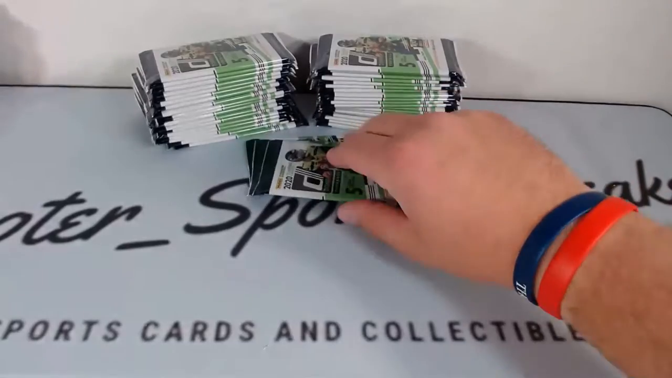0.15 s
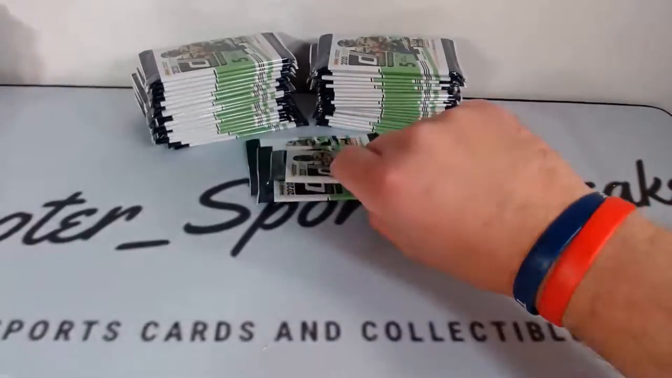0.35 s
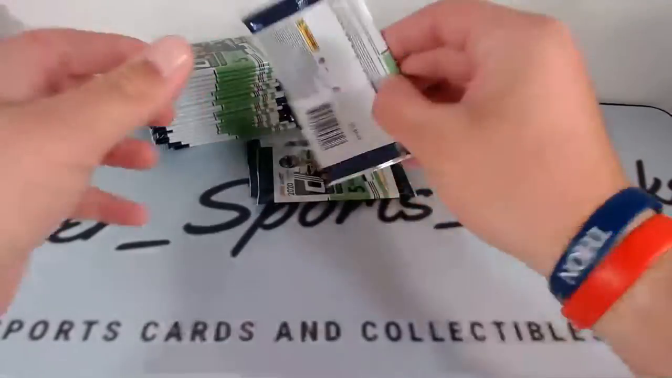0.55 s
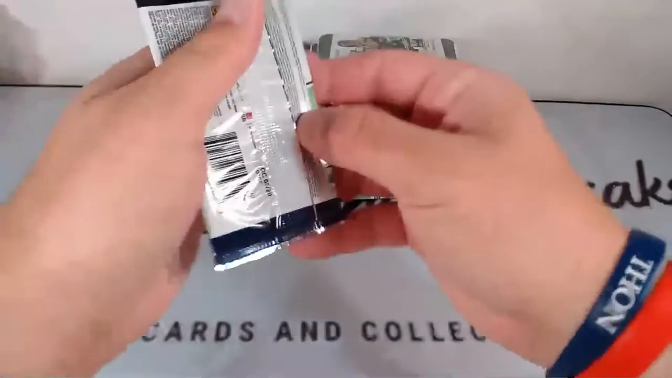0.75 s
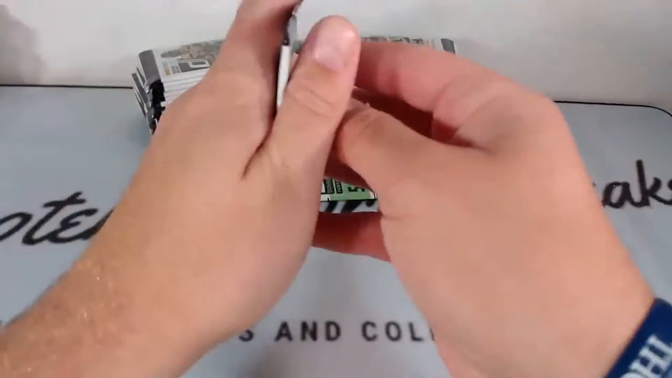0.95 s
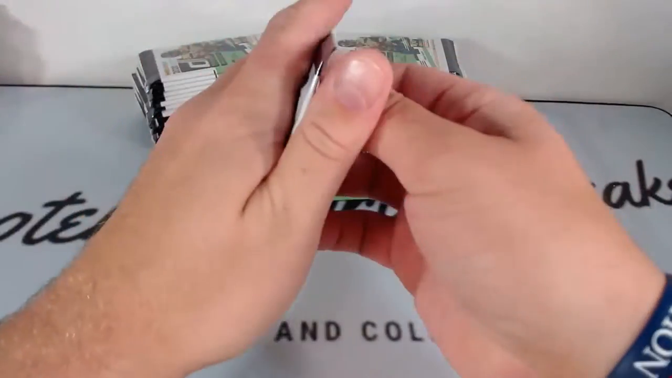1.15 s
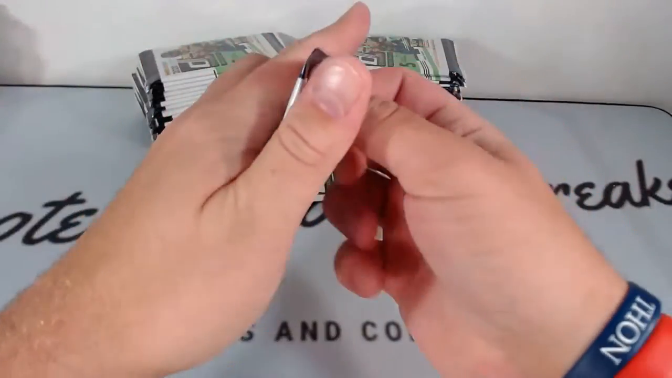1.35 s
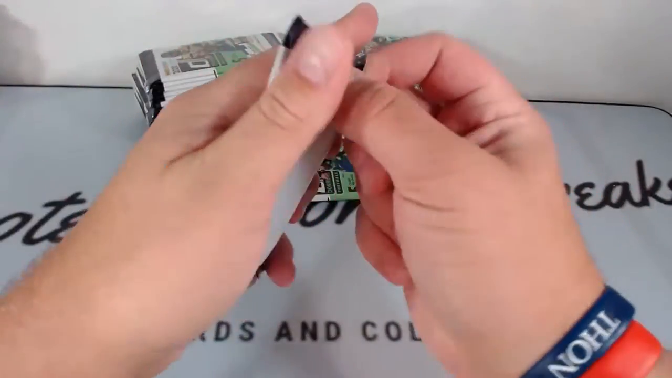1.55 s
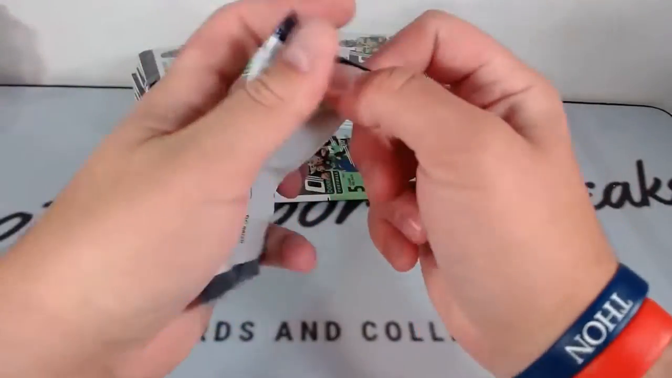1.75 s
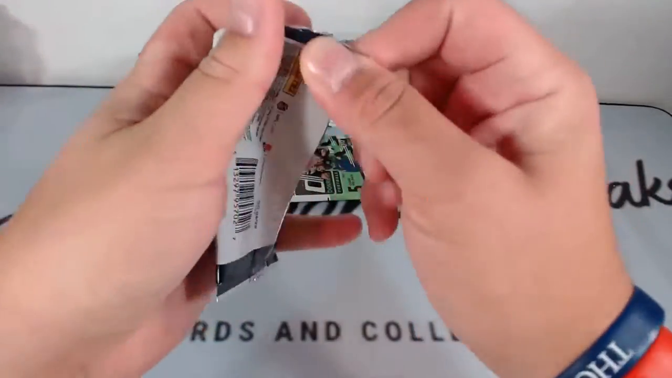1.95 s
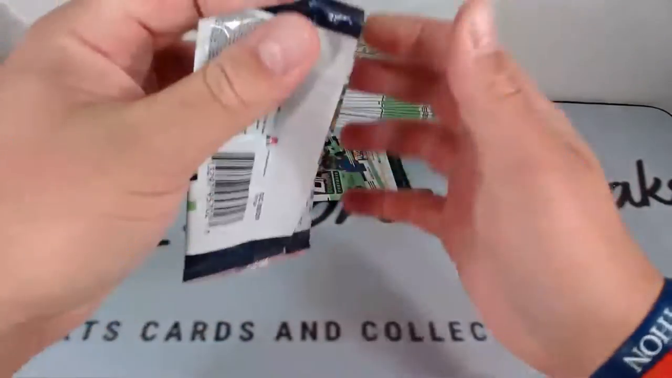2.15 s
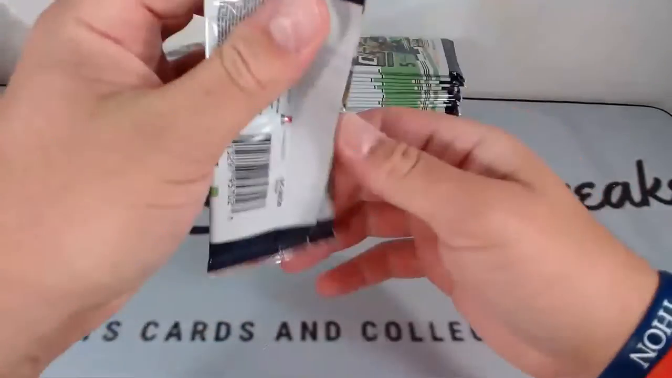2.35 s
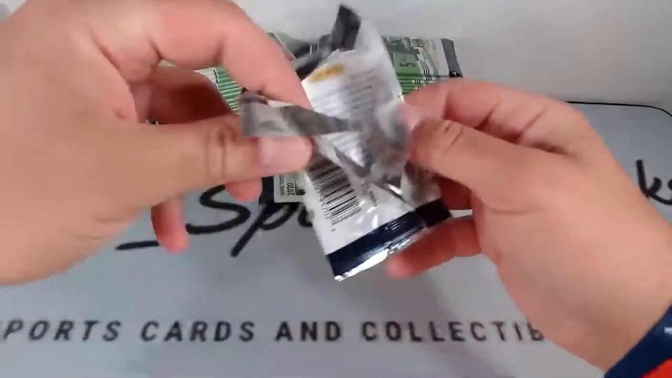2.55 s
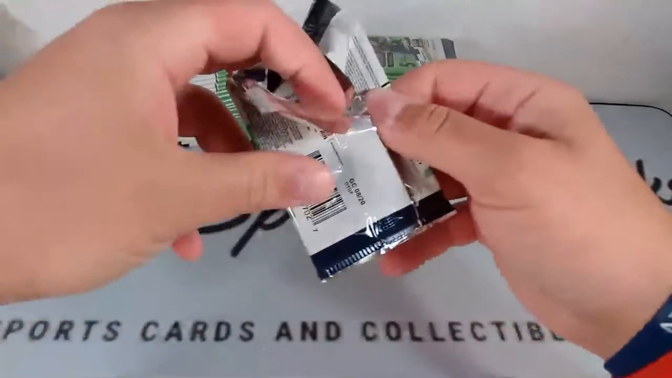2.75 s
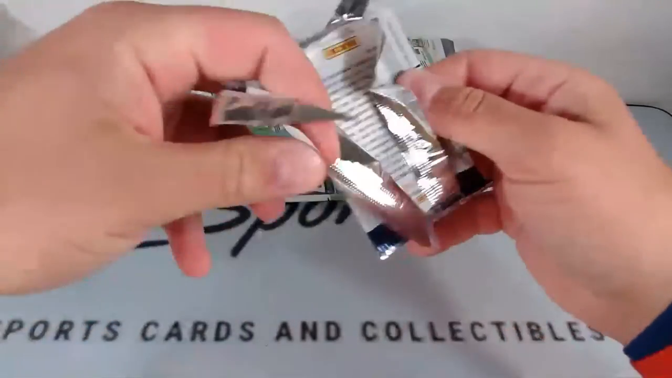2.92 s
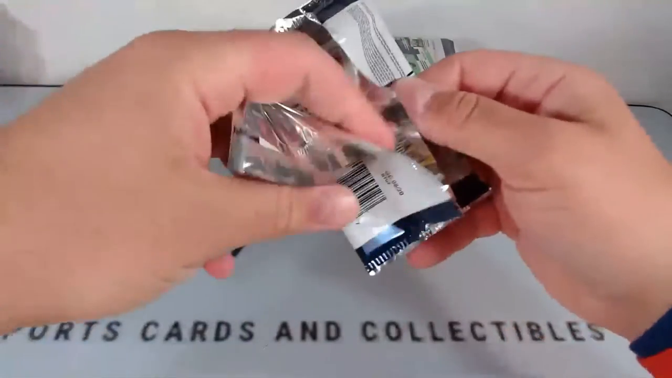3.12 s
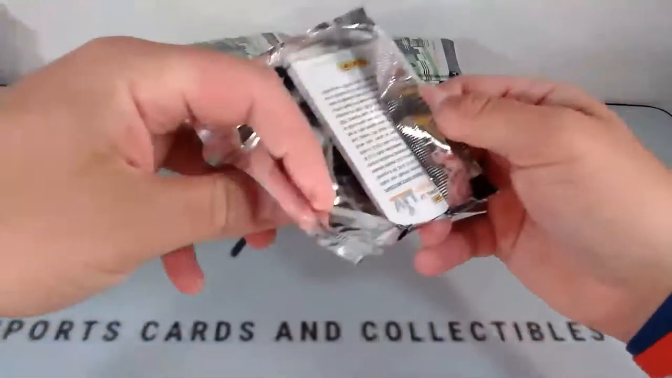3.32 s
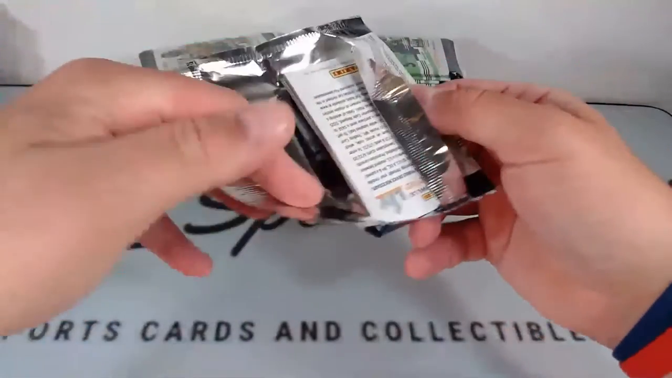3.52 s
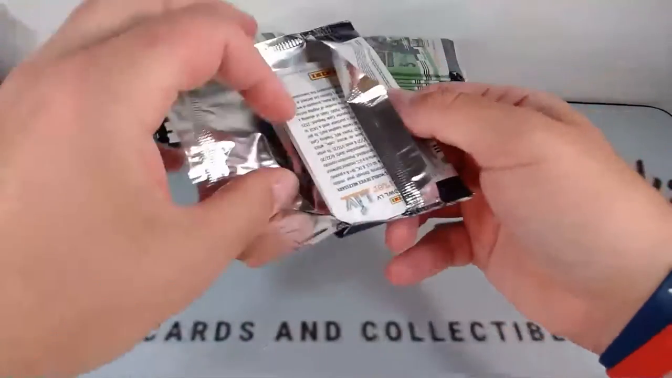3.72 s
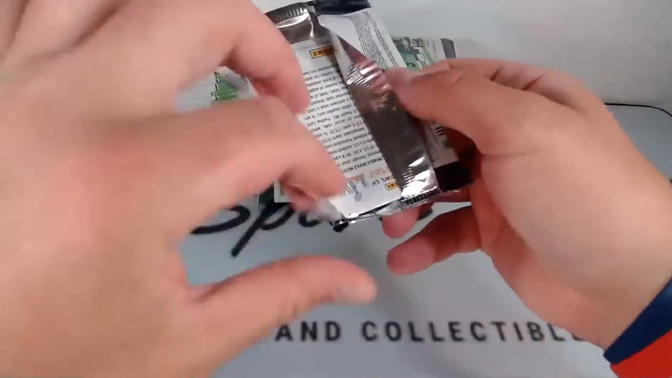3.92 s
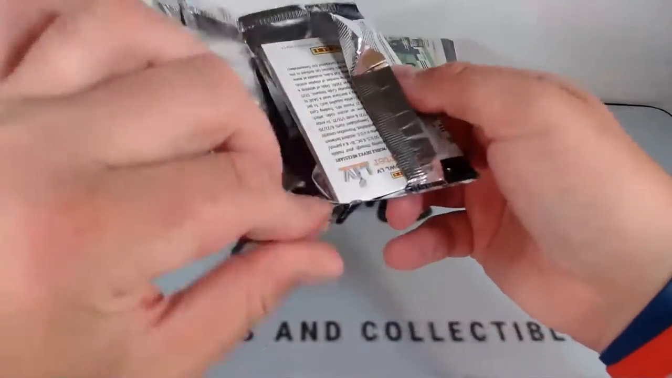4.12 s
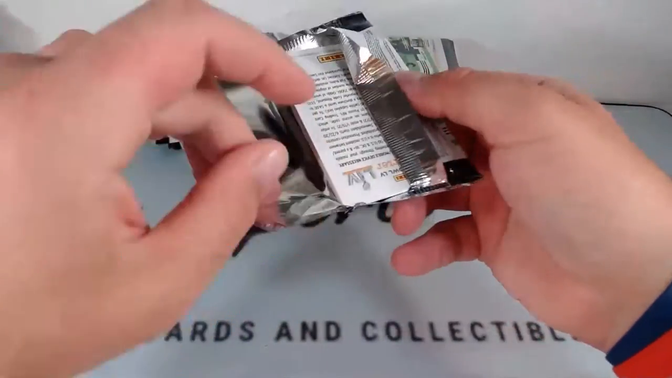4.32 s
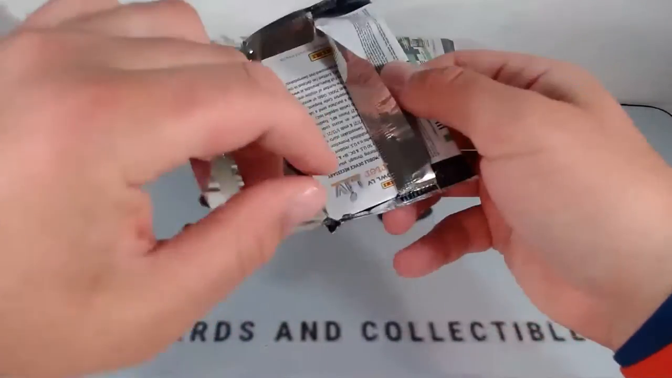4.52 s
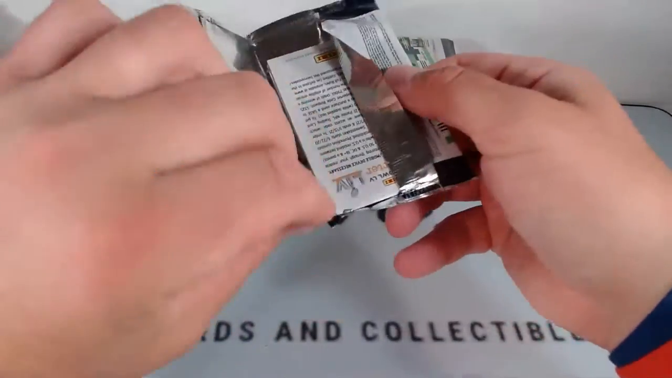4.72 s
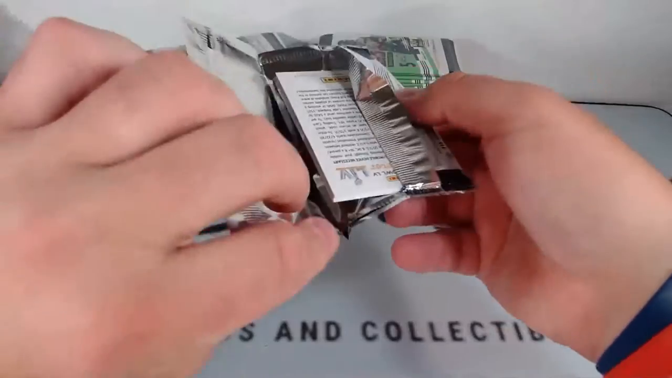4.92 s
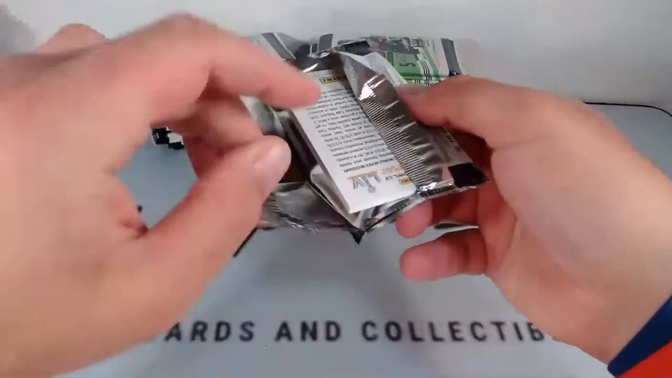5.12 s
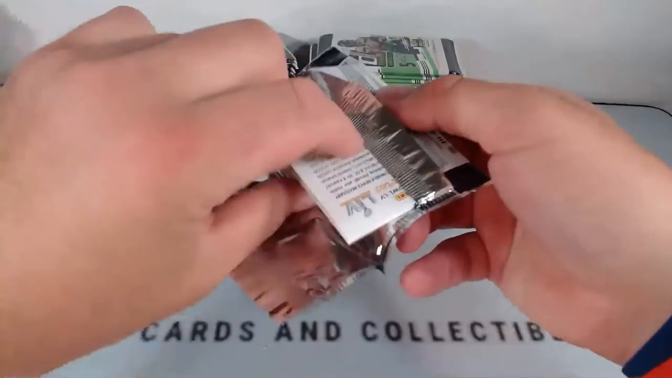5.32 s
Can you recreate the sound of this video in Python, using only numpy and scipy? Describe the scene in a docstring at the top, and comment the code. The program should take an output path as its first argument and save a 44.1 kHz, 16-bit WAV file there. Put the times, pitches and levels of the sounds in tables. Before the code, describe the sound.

Hands pull a stiff foil packet apart: sharp dry snaps, short tearing runs and dense crackle, then sparse small crinkles in a small room.

```python
"""Foil hisses and soft bumps sound as a pack of cards is picked off a table, close to a small microphone.
It is then pulled open and peeled back by hand: creases snap singly, the seam rips in short runs, facets crackle.
Hiss, rips and crackle are streams of tiny noise buckles; snaps are a click plus one buckle; bumps are short sines.
Table modes and a small room ring after each sound; the microphone passes little above 7 kHz."""
import sys
import numpy as np
from scipy import signal
from scipy.fft import rfft, irfft
from scipy.io import wavfile
from scipy.ndimage import uniform_filter1d

SR = 44100
rng = np.random.default_rng(int(sys.argv[2]) if len(sys.argv) > 2 else 0)


def inscribe(sig):
    """Save sig as 16-bit PCM at rate SR to the path in sys.argv[1].

    A 1-D sig is mono; a 2-D sig holds one channel per row.
    Samples are clipped to [-1, 1] before scaling.
    """
    pcm = np.round(np.clip(np.atleast_2d(sig).T, -1, 1) * 32767)
    wavfile.write(sys.argv[1], SR, pcm.astype(np.int16))


N = 236640
TIME = np.arange(N) / SR


def amp(db):
    """Decibels to gain."""
    return 10 ** (np.asarray(db) / 20)


def evened(x):
    """Scales to an rms of one."""
    return x / np.sqrt(np.mean(x ** 2) + 1e-20)


def read(points, hz):
    """Reads (f/Hz, value) points on a logarithmic frequency axis."""
    f, value = np.transpose(points)
    return np.interp(np.log(hz + 1), np.log(f + 1), value)


def add(mix, s, sound):
    """Mixes a sound in at time s."""
    part = mix[max(round(s * SR), 0):][:len(sound)]
    part += sound[:len(part)]


def colour(x, points, size=2048):
    """Causal minimum-phase filter with the given (f/Hz, level/dB) outline; keeps its ringing tail."""
    log_gain = np.log(amp(read(points, abs(np.fft.fftfreq(size, 1 / SR)))))
    taps = np.fft.ifft(np.exp(np.conj(signal.hilbert(log_gain)))).real
    return signal.fftconvolve(x, taps[:size // 2])


FACET_RISE_S = 0.00045


def facet(ring_s, share, size=512):
    """One buckle: a brief flutter whose chance resonances are about a share of their pitch wide."""
    t, bins = np.arange(size) / SR, np.arange(size + 1)
    envelope = np.exp(-t / ring_s) * (1 - np.exp(-t / FACET_RISE_S))
    z = rfft(rng.standard_normal(size) * envelope, 2 * size)
    total, reach = np.cumsum(abs(z) ** 2), share * bins + 2
    above, below = np.interp(bins + reach, bins, total), np.interp(bins - reach, bins, total)
    power = (above - below) / (2 * reach)
    # evens out the broad outline only
    log_gain = -np.log(np.r_[power, power[-2:0:-1]] + 1e-12) / 2
    flatten = np.exp(np.conj(signal.hilbert(log_gain)))[:size + 1]
    return irfft(z * flatten)[:size]


def crackle(per_s, spread_db, ring_s, count=24):
    """A steady stream of tiny buckles of uneven size, shared among a few facets."""
    size_db = spread_db * np.minimum(rng.exponential(1, N), 4)
    clicks = (rng.random(N) < per_s / SR) * amp(size_db)
    # the hand feeds in energy steadily
    clicks /= np.sqrt(abs(uniform_filter1d(clicks ** 2, size=700)) + 1e-4)
    which = rng.integers(0, count, N)
    return sum(signal.oaconvolve(clicks * (which == k), facet(ring_s, share=0.36))[:N] for k in range(count))


RING_HALF_WIDTH = 0.13  # share of its pitch


def ringing(points, hz, db):
    """Adds the resonance of one patch of foil to a (f/Hz, level/dB) outline."""
    f = np.geomspace(20, 20000, 300)
    return np.c_[f, read(points, f) + db / (1 + ((f / hz - 1) / RING_HALF_WIDTH) ** 2)]


def stroke(start, end, attack_s, sag_db_per_s, release_s):
    """Gain of one move of the fingers: attack, a sloping hold, release."""
    held = np.clip(TIME - start, 0, end - start)
    release = np.exp(-np.maximum(TIME - end, 0) / release_s)
    return np.minimum(held / attack_s, 1) * amp(-sag_db_per_s * held) * release


# foil brushing over foil: [start t/s, end t/s, level/dB, resonance f/Hz, rasp lift/dB]
BRUSHES = [(.008, 0.058, -67, 5400, -2), (0.084, 0.286, -84, 5040, -1), (0.12, 0.172, -68.5, 4830, -2),
           (0.156, 0.219, -74, 5000, -2), (0.278, 0.371, -70.5, 6140, -7), (0.368, 0.463, -79, 5170, -4),
           (0.462, 0.494, -66.5, 4720, 4), (0.493, 0.529, -58.5, 4700, 3.5), (0.814, 0.88, -69.5, 5700, 0),
           (0.95, 0.997, -78, 5200, -8), (1.02, 1.086, -76, 5040, 0), (3.782, 3.832, -71, 5480, 9),
           (3.916, 3.984, -58.5, 5650, 3), (3.98, 4.033, -73.5, 5600, 6)]
# sliding foil hiss: [f/Hz, level/dB]
HISS = [(300, -48), (900, -30), (2200, -17.5), (3100, -18), (4000, -12.5), (5000, -4.5), (7000, -4.5)]
# band of the rasp: [f/Hz, share of the rasp lift]
RASP = [(1000, 0.074), (1800, 0.69), (3400, 1), (4600, 0)]
BRUSH_ATTACK_S, BRUSH_RISE_DB_PER_S, BRUSH_RELEASE_S = 0.0099, 6, 0.0043
BRUSH_RING_DB = 3


def slide():
    """Smooth foil slips over foil with a thin hiss, coloured by the patch that is rubbed."""
    out, grains = np.zeros(N), crackle(per_s=2000, spread_db=2.5, ring_s=0.0004)
    for start, end, db, hz, rasp_db in BRUSHES:
        f, tone_db = ringing(HISS + [(9000, -15.5)], hz, BRUSH_RING_DB).T
        hiss = colour(grains, np.c_[f, tone_db + rasp_db * read(RASP, f)])[:N]
        gain = stroke(start, end, BRUSH_ATTACK_S, -BRUSH_RISE_DB_PER_S, BRUSH_RELEASE_S)
        out += amp(db) * evened(hiss) * gain
    return out


# hands bumping table and pack: [t/s, level/dB before a 3 dB lift of the swing, f/Hz]
BUMPS = [(0.029, -64, 72.6), (0.142, -41, 127), (0.158, -31, 104), (0.245, -40, 87.5), (0.26, -44, 93.5),
         (0.295, -51, 113), (.312, -54, 109), (1.046, -57, 126), (1.433, -48, 370), (1.502, -50.5, 337),
         (1.938, -19.5, 310), (1.991, -39.5, 317.3), (2.022, -44, 285), (2.061, -38.5, 276),
         (2.424, -56, 90.5), (2.43, -45.5, 246.7), (3.047, -36, 263), (3.1, -36.5, 326),
         (3.533, -41.5, 260), (3.557, -50.5, 74.5), (3.766, -45, 300), (3.77, -50, 102), (3.976, -51, 122),
         (4.163, -43.5, 313), (4.568, -54.5, 350), (4.936, -61, 285), (5.094, -63, 100),
         (5.179, -45.5, 310)]
# skin rub spectrum: [f/Hz, relative level/dB]
RUB = [(60, -14.5), (140, 11), (330, -17.5), (800, -29), (2500, -47.5), (6000, -36)]
BUMP_CYCLES = 0.8  # from the centre to 1/e
# the rub grows no louder once the tabled bump level passes the limit
RUB_DB, RUB_S, RUB_LIMIT_DB = -20, 0.017, -37.5


def bumps():
    """The hand pushes on the padded table or the pack: a few slow, rounded swings and a soft rub."""
    out, rub = np.zeros(N), evened(colour(rng.standard_normal(N), RUB)[:N])
    for s, db, hz in BUMPS:
        t = TIME - s
        swing = np.exp(-(t * hz / BUMP_CYCLES) ** 2) * np.sin(2 * np.pi * hz * t)
        out += amp(db + 3.0) * swing
        out += amp(min(db, RUB_LIMIT_DB) + RUB_DB) * np.exp(-(t / RUB_S) ** 2) * rub
    return out


# room decay: [f/Hz, t60/s]
ROOM_T60 = [(90, 0.098), (220, 0.17), (700, 0.18), (2000, 0.12), (7000, 0.15)]
# room against the direct sound: [f/Hz, level/dB]
ROOM_DB = [(100, -6), (300, -5), (800, -9), (1500, -7), (3000, -11), (7000, -12.5)]


def walls(t):
    """Sparse reflections for one position of the hands, each band dying at its own speed."""
    sparse = rng.random(len(t)) < 5000 / SR
    taps = rng.standard_normal(len(t)) * sparse * np.clip((t - 0.002) / 0.006, 0, 1)
    hz, at, z = signal.stft(taps, SR, nperseg=256)
    decay = amp(-60 * at / read(ROOM_T60, hz)[:, None])
    tail = signal.istft(z * decay, SR, nperseg=256)[1]
    return colour(tail / np.linalg.norm(tail), ROOM_DB)[:len(t)]


# table top and things on it: [f/Hz, level/dB, t60/s]
TABLE_MODES = [(325, -8, .1), (489, -9, .1), (618, -8, .13), (734, -8.5, .12), (820, -14, .12),
               (905, -6, .14), (1421, -7, .1), (2750, -14, .12), (2900, -12, .12)]
POSITION_S = 0.17


def surroundings(x, count=4):
    """The table rings, and the walls answer with a pattern that shifts as the hands move."""
    t, ring = np.arange(SR // 2) / SR, 0
    for hz, db, t60 in TABLE_MODES:
        unit_peak = 2 * np.log(1000) / (t60 * SR)
        ring = ring + amp(db) * unit_peak * amp(-60 * t / t60) * np.sin(2 * np.pi * hz * t)
    out = signal.fftconvolve(x, ring)[:N]
    place = TIME / POSITION_S
    for k in range(count):  # crossfades round the positions in turn
        away = abs((place - k) % count - count / 2)
        out += signal.fftconvolve(x * np.cos(np.pi / 2 * np.minimum(away, 1)), walls(t))[:N]
    return out


# corners of the thud, pop, crack and bright edge: [f/Hz]
FOIL_HZ = [120, 300, 680, 1300, 2100, 3500, 5000]


def foil_tone(thud_db, pop_db, bright_db):
    """Spectrum of a buckling patch: wide panels give the low end, sharp creases the top."""
    low_db = [thud_db - 40, thud_db - 16, thud_db]
    return list(zip([20] + FOIL_HZ, low_db + [pop_db, min(0.18 * pop_db, 9), 0, 0, bright_db]))


# long pull splitting the seam: [t/s, effort level/dB, panel flex/dB]
SPLIT = [(1.14, -85, 2.5), (1.213, -40.5, 0.5), (1.26, -61, -10), (1.318, -34, -19), (1.41, -54, -7),
         (1.45, -44, -8), (1.65, -43, -6), (1.788, -48.5, -11.5), (1.867, -23, -1.5), (1.928, -26.5, 0.5),
         (1.947, -30.5, -11.5), (1.98, -40.5, 5), (2.15, -43.5, -3), (2.209, -58, -3), (2.26, -58.5, 12),
         (2.31, -98, -21)]
# long pull peeling the foil back: [t/s, effort level/dB, panel flex/dB]
PEEL = [(2.393, -66, 5.5), (2.428, -41.5, 4), (2.554, -42.5, -9.5), (2.596, -58, -21), (2.651, -29.5, 4.5),
        (2.729, -37.5, -1.5), (2.929, -43.5, -13), (3.002, -29, 13.5), (3.06, -48, -3.5),
        (3.09, -34.5, 5.5), (3.21, -57, 0.5), (3.26, -32, 1), (3.295, -42, -0.5), (3.347, -29, 7.5),
        (3.44, -47.5, 8), (3.55, -49, 3.5), (3.645, -59.5, 1), (3.749, -42, 1.5), (3.862, -114, 5)]
# short crinkles as the fingers take a new grip: [start t/s, end t/s, level/dB, panel flex/dB]
CRINKLES = [(3.873, 3.905, -64, 18), (3.93, 3.973, -60.5, 15.5), (4.055, 4.179, -54.5, 13.5),
            (4.199, 4.307, -53, -17), (4.4, 4.445, -59.5, 3), (4.421, 4.457, -56, 13.5),
            (4.56, 4.609, -65.5, 2), (4.78, 4.838, -66.5, -1.5), (4.893, 4.934, -43, 0),
            (4.96, 4.985, -54, -15), (5.044, 5.16, -53.5, 12.5), (5.223, 5.267, -49.5, 0.5)]


def flex(s):
    """How much the wide panels of the pack bend at a given time, in dB."""
    grips = [(at, bend) for start, end, _, bend in CRINKLES for at in (start, end)]
    pulls = [(at, bend) for at, _, bend in SPLIT + PEEL]
    return np.interp(s, *np.transpose(sorted(grips + pulls)))


THUD_DB, THUD_PER_POP = -8.5, 0.13


def thud_of(s, pop_db):
    """Low end of a snap or rip, in dB against its strength: more when panels flex and when it is hollow."""
    return THUD_DB + flex(s) + THUD_PER_POP * pop_db


# creases snapping through: [t/s, level/dB, hollow pop re level/dB, bright edge re level/dB,
# crease ring f/Hz, ring height/dB]
SNAPS = [(0.8228, -37.5, -9, -7, 1800, 10), (0.8747, -22.5, 21.5, 17, 2640, 19.2),
         (0.9038, -38.5, 18, -15, 2670, 17), (1.0446, -42, 8, 10, 2300, 7.7),
         (1.1536, -17, -3, 4.5, 2090, 8.4), (1.199, -13.5, 6.5, -8, 5900, 23),
         (1.2062, -15.5, 1, 1.5, 5940, 10), (1.2251, -12.5, 13.5, 19, 3440, 13),
         (1.2289, -4.5, 3, -3, 1400, 5.4), (1.2409, -14.5, 1, 15, 1520, 7.8),
         (1.2806, -15.5, 8, -15, 1370, 9), (1.3029, -9, 2, 8.5, 1480, 17), (1.3097, -9.5, -7, 9, 1560, 15),
         (1.3144, -15.5, -18.0, 12.5, 2550, 21), (1.3388, -3.5, -16, 1, 5200, 17.8),
         (1.3702, -10.5, -13, 3, 1360, 6.2), (1.4322, -8, 0.5, 3.5, 3570.0, 6.1),
         (1.4395, -9.5, 5.5, 9, 3350, 16.5), (1.4683, -24, 12, 16, 3190, 9),
         (1.4994, -7.5, -2, 13.5, 5620, 8.8), (1.5328, -25.5, 21.5, 11, 3120.0, 10),
         (1.5465, -26, -18, -2, 3650, 30.5), (1.6057, -4.5, -0.5, 4, 3370, 11.6),
         (1.6207, 1.5, -4.5, 10, 3800, 6.6), (1.6561, 12, -17, -7, 3100, 7.2),
         (1.6739, -3, -10, 3.5, 3230, 18), (1.681, -17.5, -5.5, 5, 2910.0, 13),
         (1.7294, -11, -16, -9.5, 5060, 23), (1.7526, -7.5, 14, 6, 3370, 6.8),
         (1.7652, -19, 9, -1.5, 3520, 21), (1.787, -26.5, -5.5, 0, 3450, 10),
         (1.814, -6, -0.5, 3.5, 1440, 12.3), (1.8623, 14, -13, -12.5, 6930, 23.2),
         (1.8664, 5, 12.5, -0.5, 3830, 13), (1.9159, -3.5, 11, 9, 3340.0, 16),
         (1.9363, 10, 6, 0, 5350, 6.1), (1.9454, 4, -3.5, 2.5, 1280.0, 3.7), (1.975, -17, 0, 2, 2930, 22),
         (2.0147, -2, 4, -9, 2370.0, 10.2), (2.0328, -11, -1, 1, 3020, 8), (2.0447, -10.5, 0, 2, 2740, 8.3),
         (2.059, -3, 2, -10, 1470, 15), (2.0674, -4, -1, 2, 3870, 11.5), (2.0905, -15.5, 7, -8, 1420, 19),
         (2.1311, -7.5, 9, -4, 3000, 8.1), (2.1504, -0.5, -7.5, 2.5, 5030, 11.3),
         (2.1635, -3.5, -1, 10.5, 2710, 9.6), (2.198, -18, 11, -13, 2380, 9.5),
         (2.4236, -16, -1, -10, 2100, 12), (2.454, -12.5, 3, 3, 2710, 7.2),
         (2.4897, -8.5, -9, 0, 4240, 14.5), (2.4948, -3, -17, -0.5, 2940, 8.4),
         (2.542, -29.5, -16, 14, 3380, 15), (2.5505, -25.5, -21, 11, 4900, 16),
         (2.6169, -22, 5, 13, 3520, 12), (2.623, -10, -9, 10.5, 6160.0, 7.6),
         (2.6372, -5, -9, 13, 2520, 7.1), (2.6468, 0, 4.5, 6, 5500, 5.2), (2.6845, 2.5, -3, -6, 2280, 11.5),
         (2.6954, -0.5, 1.5, 3, 6500, 9.9), (2.7493, -18, 9, -12, 4570, 12),
         (2.8065, -18, 2, 26.5, 3320, 16), (2.8187, -6.5, -3, 16, 3030, 13),
         (2.8408, -17, 15, 11, 3960, 21.4), (2.8691, -10, -2.5, 2, 5020.0, 16),
         (2.882, -15, 6.5, 11, 5380.0, 9.8), (2.8944, -15, 5, 12, 3270, 10),
         (2.912, 2.5, -6, -0.5, 6260, 9.6), (2.9243, -4.5, -18.5, 2, 5380.0, 11.5),
         (2.9456, -14, 12.5, 12.5, 2980, 23), (2.9621, -13.5, -17, 26.5, 3340.0, 7.1),
         (2.9782, 5.5, -6.5, -2.5, 5380.0, 14), (3.0267, -21.5, 23, 21, 5760.0, 9.1),
         (3.0786, -2.5, 7, 9, 1200.0, 4.2), (3.0945, -5, 1.5, -6, 2200, 10.6),
         (3.1397, -15.5, 10, 11.5, 3550, 13), (3.1837, -15.5, 13.5, 11, 2910.0, 12.4),
         (3.228, -11, -24.5, -1.5, 2520, 20.3), (3.244, -19.5, 8, -13.5, 3560, 24),
         (3.2539, -15, 2, 7, 4090.0, 17), (3.2625, -6, 4, 8.5, 1470, 15),
         (3.2948, -20.5, 10, 18, 2720.0, 14), (3.3074, -0.5, -7, -1, 6650, 8.8),
         (3.3235, 4.5, -11.5, -14.5, 1470, 13.3), (3.3355, 6, 15.5, 5.5, 1370, 13),
         (3.363, 3, 1, 7.5, 1170, 6.9), (3.397, -2, 3, 5.5, 1200.0, 10), (3.4167, -11, 23, 8, 3600, 11),
         (3.529, -2.5, 7.5, 1.5, 5440, 17.7), (3.5548, -17, 5.5, -5, 3000, 7.4),
         (3.611, -17, 9.5, -3.5, 4300, 4.4), (3.6635, -23, 13.5, -1.5, 2860, 8.6),
         (3.7048, -29, 7.5, 5, 3010, 8), (3.739, -24.5, -15, 10.5, 5770, 8.3),
         (3.7572, -14.5, 1.5, -3.5, 5720, 20), (3.962, -29, 25.5, 11.5, 2890, 19),
         (4.066, -13, 15, 3.5, 5540, 17), (4.0801, -19, 18, 9, 1350, 28), (4.0935, -16.5, 8, 12, 1190, 9),
         (4.1265, -21, 19, -3, 1210, 7), (4.1391, -18.5, 22, 5, 2300, 18.5),
         (4.1538, -14.5, 14.5, -9, 1120, 6.2), (4.1591, -21.5, 18, 13, 2670, 11),
         (4.1883, -26.0, 23, 5, 1200.0, 9), (4.256, -19, 19.5, 11, 2520, 22.6),
         (4.2857, -9, 11, -1, 1240, 9.1), (4.436, -33.5, 18, 18, 4640, 14),
         (4.4478, -17, 7, 14.5, 3460, 15.8), (4.4718, -18.5, -5, 7, 1400, 14.5),
         (4.5655, -42, 35, 1, 5020.0, 4.3), (4.5897, -33, 27, 9.5, 1182, 5.3),
         (4.7038, -49, 30.5, -6, 1170, 3.6), (4.8851, -18, 13, 21, 4380.0, 4.7),
         (4.901, -10, 3, 3, 5650, 13), (4.9183, -7.5, -1.5, -1.5, 5700, 21.4),
         (4.9329, -15, 18, 5, 2500, 20.6), (4.9401, -15.5, -2, 4.5, 4320, 14),
         (4.9458, -13, -10, 3.5, 5600, 13.6), (5.0627, -13.5, 4.5, 5.5, 6430, 12),
         (5.0918, -21.5, 27.5, 0, 5300, 20), (5.1109, -44.5, 33, -8, 4760, 12),
         (5.1227, -14, 13.5, -3, 2340, 11), (5.232, -16, -21, -6.5, 6670, 14.3),
         (5.2956, -2.5, -9, 6, 6870, 10.3)]
LEAD_DB, CLICK_DB, FLUTTER_DB = -34, -5, -6


def snaps():
    """Single creases give way with a hard click after a very short, faint noise swell, then ring and flutter."""
    out, lead = np.zeros(N), np.arange(-256, 0) / SR
    for s, db, pop_db, bright_db, ring_hz, ring_db in SNAPS:
        lead_noise = amp(LEAD_DB) * np.exp(lead / 0.0016) * rng.standard_normal(len(lead))
        flutter = amp(FLUTTER_DB) * facet(ring_s=0.0016, share=0.26)
        snap = np.r_[lead_noise, amp(CLICK_DB), flutter]
        tone = ringing(foil_tone(thud_of(s, pop_db), pop_db, bright_db), ring_hz, ring_db)
        add(out, s + lead[0], amp(db) * colour(snap, tone))
    return out


# tearing and scraping runs: [start t/s, end t/s, level/dB before a 0.96 dB lift,
# hollow pop re level/dB, bright edge re level/dB, fold ring f/Hz, ring height/dB]
RIPS = [(0.88, 0.888, -61.5, 14, 4, 795, 21), (1.626, 1.652, -24, -7, 6, 3400, 1.8),
        (1.858, 1.873, -20, -21, 8.5, 3030, 11), (1.876, 1.913, -19.5, -0.5, 2, 3210, 6.8),
        (2.651, 2.668, -18.5, 1.5, 7, 5630, 0.84), (2.954, 2.98, -28.5, 6, 10, 6400, 3.3),
        (2.97, 3.005, -29.5, 2, 6, 1700, 3.3), (3.343, 3.361, -32.5, -14, 8, 1360, 6),
        (3.357, 3.379, -26.5, 8.5, 7, 1450, 7.2), (3.45, 3.492, -35.5, 10, 1, 1860, 13.5),
        (3.517, 3.539, -30.5, 6, 6, 1390, 9.6), (3.55, 3.608, -43.5, 14.5, -5, 1500, 4),
        (3.651, 3.729, -57.5, 17.5, 5.5, 2900, 2), (3.729, 3.747, -55, -4, 14, 5530, 3.8),
        (3.751, 3.76, -33, -16, -10, 4970, 3.1), (4.219, 4.248, -34, 1.5, 7.5, 4570, 9.5),
        (4.796, 4.817, -62, 32.5, 7, 4020, 3.8), (5.257, 5.273, -54, 20, 8, 2710, 4.3)]


def rips():
    """Seam and folds let go, or scrape along each other, in a fast run of tiny slips."""
    out, tears = np.zeros(N), crackle(per_s=1800, spread_db=3.2, ring_s=0.0008)
    for start, end, db, pop_db, bright_db, ring_hz, ring_db in RIPS:
        run = tears[round(start * SR):round(max(end, start + 0.004) * SR)]
        run = evened(run) * signal.windows.tukey(len(run), 0.25)
        tone = ringing(foil_tone(thud_of(start, pop_db), pop_db, bright_db), ring_hz, ring_db)
        add(out, start, amp(db + 0.96) * colour(run, tone))
    return out


GRIP_ATTACK_S, GRIP_SAG_DB_PER_S, GRIP_RELEASE_S = 0.014, 43, 0.026
SHOWER_DB, SHOWER_FALL_S = -29, 0.0073  # neighbouring facets give way after each snap


def effort():
    """How hard the foil is worked: two long pulls with a rest between, short grips, a shower after every snap."""
    power = np.zeros(N)
    for pull in SPLIT, PEEL:
        s, db, _ = np.transpose(pull)
        power += amp(np.interp(TIME, s, db)) ** 2 * (TIME > s[0]) * (TIME < s[-1])
    for start, end, db, _ in CRINKLES:
        grip = stroke(start, end, GRIP_ATTACK_S, GRIP_SAG_DB_PER_S, GRIP_RELEASE_S)
        power += (amp(db) * grip) ** 2
    shower = np.exp(-TIME[:SR // 2] / SHOWER_FALL_S)
    for s, db, *_ in SNAPS:
        add(power, s, (amp(db + SHOWER_DB) * shower) ** 2)
    return np.sqrt(power)


POP_PER_FLEX, POP_DB = 0.9, -2.2


def handling():
    """Fine crackle under the fingers; the wider panels add pops and thuds as they flex."""
    thud_db = flex(TIME)
    pop_db = POP_DB + POP_PER_FLEX * thud_db
    grains = effort() * crackle(per_s=540, spread_db=5.0, ring_s=0.0012)
    # outlines: f/Hz, level/dB
    thud_tone = [(20, -43.0), (110, 1.5), (230, 3.5), (420, -6.0), (700, -27.5), (1500, -59.5)]
    pop_tone = [(250, -38.5), (450, -6.0), (620, 5.0), (900, 4), (1100, -2.5), (1450, -1.5),
                (2200, -8.5), (4000, -49.0)]
    crack_tone = [(600, -47), (1600, -8.0), (3000, -0.5), (6500, 4.0)]
    thud = colour(grains * amp(thud_db), thud_tone)
    pop = colour(grains * amp(pop_db), pop_tone)
    crack = colour(grains, crack_tone)
    return (thud + pop + crack)[:N]


PATCH_RMS_DB, PATCH_FULL_FROM_HZ = 3.9, 800


def changing_shape(x):
    """As the pack bends between the hands, its upper resonances come and go in narrow patches."""
    z = signal.stft(x, nperseg=256, noverlap=192)[2]
    field = rng.standard_normal(z.shape)
    for _ in range(2):
        field = uniform_filter1d(uniform_filter1d(field, size=3, axis=0), size=30, axis=1)
    field -= uniform_filter1d(field, size=13, axis=0)  # the broad outline stays
    depth = np.clip(np.fft.rfftfreq(256, 1 / SR) / PATCH_FULL_FROM_HZ, 0, 1)[:, None] ** 2
    gain = amp(PATCH_RMS_DB * depth * evened(field))
    return signal.istft(z * evened(gain), nperseg=256, noverlap=192)[1][:N]


# fingertip juddering across taut foil: [start t/s, end t/s, mean level/dB, slip rate f/Hz]
JUDDERS = [(2.227, 2.296, -21.5, 145)]
# slip spectrum: [f/Hz, level/dB]
JUDDER_TONE = [(200, -15), (800, -15), (1500, -4.5), (2600, -3), (3800, -4.5), (5000, -12), (7000, -16)]


def judders():
    """A fingertip sticks and slips on the foil at a nearly even rate, then lifts off."""
    out = np.zeros(N)
    for start, end, db, per_s in JUDDERS:
        for s in np.arange(start, end, 1 / per_s):
            late_s, size_db = rng.standard_normal(2) * [0.0008, 2.5]
            slip = colour(facet(ring_s=0.0025, share=0.21), JUDDER_TONE)
            add(out, s + late_s, amp(db + size_db) * slip)
    return out


# low end of the taut, closed pack: [f/Hz, level/dB]
SEALED = [(50, -9.5), (130, -5.5), (230, 0)]
# flaps start and finish coming loose: [t/s]
OPENS_S = [2.7, 3.0]


def opening(x):
    """The pack sounds thin while sealed and gains its low end as the flaps come loose."""
    loose = np.interp(TIME, OPENS_S, [0, 1])
    return loose * x + (1 - loose) * colour(x, SEALED)[:N]


def scene():
    """The foil in its room, with the soft bumps of the hands."""
    worked = changing_shape(rips() + handling())
    foil = opening(snaps() + judders() + worked) + slide()
    thumps = bumps()
    return (foil + thumps + surroundings(foil + amp(-2.5) * thumps))[None]


# microphone colour: [f/Hz, level/dB]
MIC = [(25, -17.5), (70, -3.5), (160, -7.5), (210, -7.5), (310, 2.5), (500, 1.5), (640, 3), (900, 6.5),
       (1130, -1), (1600, 0), (2200, 0.5), (3250, 4.5), (3900, -0.5), (6900, -6.5), (7600, -22),
       (9200, -47.5), (10000, -66.5)]
# steady background, gain on white noise: [f/Hz, level/dB]
FLOOR = [(20, -67), (100, -56.5), (175, -65), (240, -57.5), (330, -68.5), (500, -76.5), (1000, -82),
         (2000, -88), (7000, -93.5), (10000, -100)]
EDGE_HZ = 9566


def record(dry):
    """Microphone colour, a faint steady background and the band limit."""
    heard = colour(dry[0], MIC)[:N] + colour(rng.standard_normal(N), FLOOR)[:N]
    lowpass = signal.firwin(255, EDGE_HZ, window=("kaiser", 7), fs=SR)
    return signal.oaconvolve(heard, lowpass, "same")[None]


dry = scene()
out = record(dry)
inscribe(out)
```